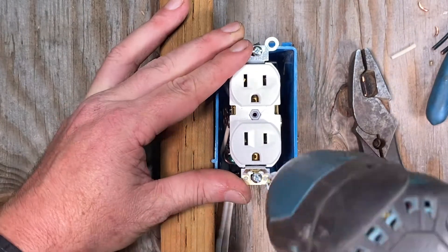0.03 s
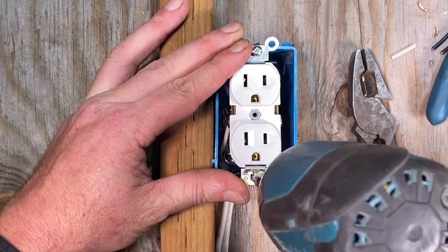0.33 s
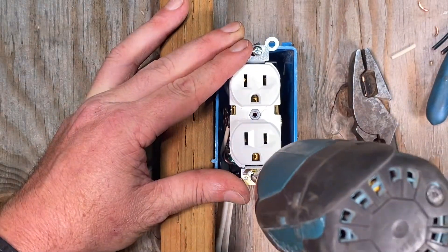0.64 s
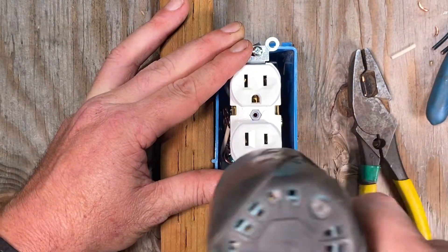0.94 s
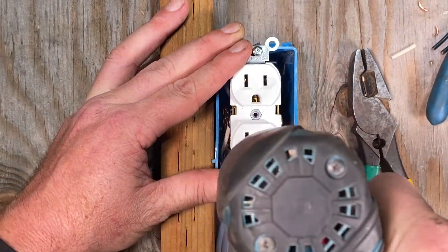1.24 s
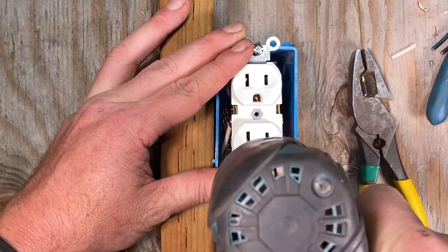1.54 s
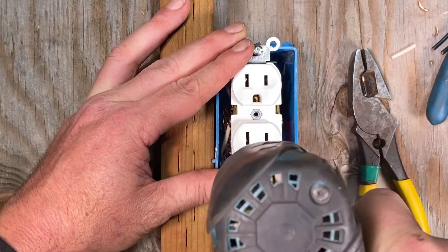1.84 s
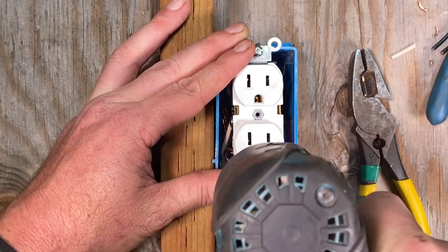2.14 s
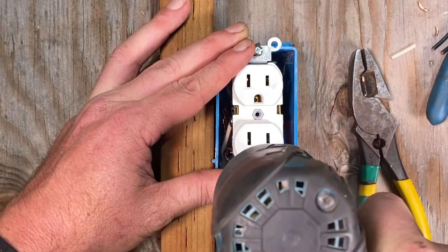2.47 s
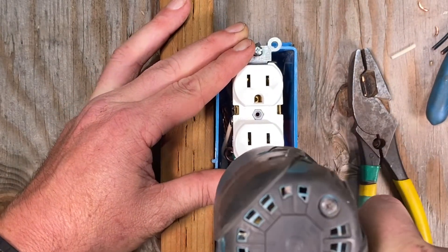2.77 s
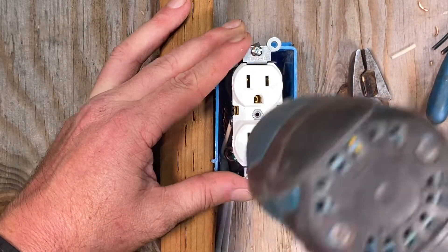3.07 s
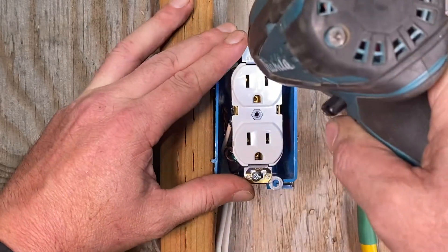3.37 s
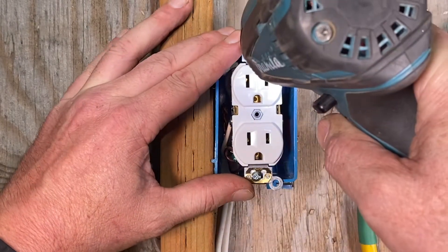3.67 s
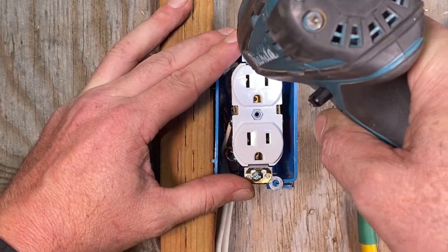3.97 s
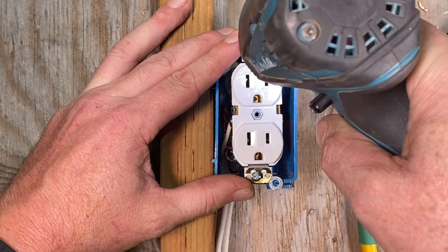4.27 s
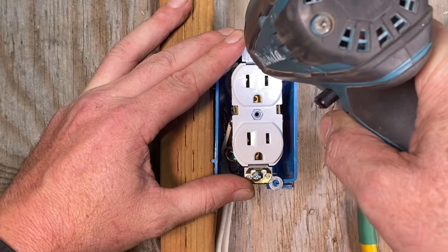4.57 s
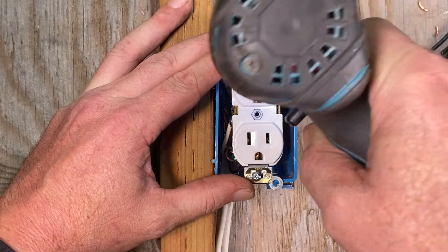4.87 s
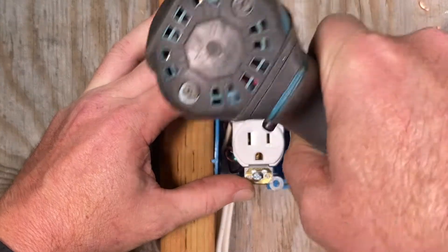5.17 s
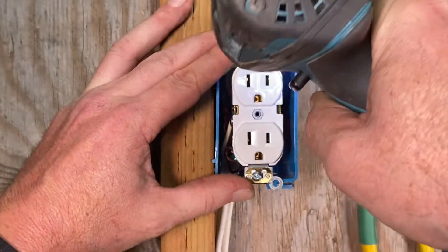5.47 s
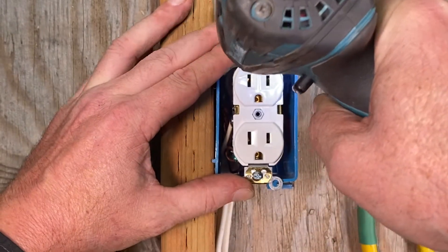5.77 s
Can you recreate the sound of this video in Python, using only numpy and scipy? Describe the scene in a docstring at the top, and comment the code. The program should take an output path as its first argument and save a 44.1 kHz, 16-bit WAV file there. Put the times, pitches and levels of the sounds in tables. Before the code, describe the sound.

Light, hollow knocks and small metallic ticks come from a bit hunting for a screw slot on a socket. Then a cordless screw gun pulses six times in a steady rhythm, clicking and whirring. The motor pauses while the bit taps and slides on the next screw, ending in a firm knock, before three more quick pulses. Everything is heard close up in a quiet workshop with little echo.

```python
"""A ring fades in a quiet workshop, and a steel bit knocks about on a screw head in a plastic wall box.
Each impact excites the damped modes of the steel, the box and the wooden board beneath it.
A cordless screw gun, close by, then drives the two screws of a socket in short pulls: the trigger
clicks, and the motor spins up through rattling, whining gears and is braked again.
Between the screws the bit knocks and slides as it hunts for the slot."""
import sys
import numpy as np
from scipy import signal
from scipy.fft import rfft, irfft, next_fast_len
from scipy.io import wavfile

SR = 44100
rng = np.random.default_rng(int(sys.argv[2]) if len(sys.argv) > 2 else 0)


def waveform_to_disk(signal):
    """Save audio, clipped to [-1, 1], as 16-bit WAV at the path in sys.argv[1]."""
    frames = np.transpose(np.atleast_2d(signal))
    scaled = np.clip(frames, -1, 1) * 32767
    samples = np.round(scaled).astype(np.int16)
    wavfile.write(sys.argv[1], SR, samples)


N = 264996
T = np.arange(N) / SR
PADDED = next_fast_len(2 * N, real=True)
FREQ = np.fft.rfftfreq(PADDED, 1 / SR)


def undb(db):
    """Amplitude ratio of a level in decibels."""
    return 10 ** (np.asarray(db) / 20)


def unit(x):
    """Normalisation to rms 1."""
    return x / np.sqrt(np.mean(x ** 2) + 1e-20)


def equal_energy(x):
    """Normalisation to the energy of rms 1 held for 20 ms."""
    return x * np.sqrt(.02 * SR / np.sum(x ** 2))


def blend(ends_db, share):
    """Gain interpolated between two levels as share goes from 0 to 1."""
    return undb(np.interp(share, (0, 1), ends_db))


def colour(x, points):
    """Zero-phase filtering by a spectrum of (f/Hz, level/dB) points."""
    hz, db = np.transpose(points)
    size = next_fast_len(2 * len(x), real=True)
    f = np.maximum(np.fft.rfftfreq(size, 1 / SR), 1)
    gain = undb(np.interp(np.log(f), np.log(hz), db))
    return irfft(rfft(x, size) * gain, size)[:len(x)]


def noise(points, size=N):
    """Spectrally shaped Gaussian noise of rms 1."""
    return unit(colour(rng.standard_normal(size), points))


def fade(t60, size):
    """Exponential decay, 60 dB in t60 seconds."""
    return np.exp(-np.log(1000) * T[:size] / t60)


def add(track, s, x):
    """Superposition of x on a track at s seconds."""
    i = max(int(s * SR), 0)
    track[i:i + len(x)] += x[:N - i]


# spectra of the opening ring and of the room air: f/Hz, level/dB
RINGING_SPECTRUM = [(60, -4), (400, 2), (1000, -13.5), (2200, -5), (4000, -17.5), (10000, -17.5),
                    (16000, -34)]
AIR_SPECTRUM = [(15, -20), (25, -6.5), (53, -0.5), (120, -5.5), (153, -7), (200, -11.5), (416, -14.5),
                (936, -30), (2000, -32), (16000, -52.5)]
def background():
    """Exponential decay: the ring of earlier work sinks into the steady noise of the room air."""
    hold_s, t60_s = 0.1, 0.55
    dying = np.exp(-np.log(1000) * np.maximum(T - hold_s, 0) / t60_s)
    ringing = undb(-51.5) * dying * noise(RINGING_SPECTRUM)
    air = noise(AIR_SPECTRUM) + np.array([[.2], [-.2]]) * noise(AIR_SPECTRUM)
    return ringing + undb(-61) * air


def ring(modes, detune, size):
    """Modal superposition: damped sines whose pitch and strength vary with the contact point."""
    hz, width, db = np.transpose(modes)[:, :, None]
    shift, strength = rng.standard_normal((2, len(modes), 1))
    waves = np.exp(-np.pi * width * T[:size]) * np.sin(2 * np.pi * hz * (1 + detune * shift) * T[:size])
    polarity = (-1) ** np.arange(len(modes))[:, None]
    return np.sum(polarity * undb(db + 2 * strength) * waves, axis=0)


def skid(size, rise_s=0.0014):
    """Transient friction: the envelope of a brief sliding contact swells and dies away."""
    return T[:size] / rise_s * np.exp(1 - T[:size] / rise_s)


def bend(x, lag_at_1k_s):
    """Dispersion: bending waves in a board travel as the root of frequency, so the lows arrive late."""
    phase_lag = 4 * np.pi * lag_at_1k_s * np.sqrt(FREQ * 1000)
    return irfft(rfft(x, PADDED) * np.exp(-1j * phase_lag), PADDED)[:N]


# modes of box and socket, of steel bit and socket strap, and of the board: f/Hz, bandwidth/Hz, level/dB
BOX_MODES = [(602, 45, -10.5), (805, 85, -6.5), (1045, 155, 4), (1149, 85, 7.5), (1575, 59, -9)]
STEEL_MODES = [(2120, 290, 2), (2314, 80, -5.5), (2730, 220, -2.5), (3470, 500, -4.5), (4000, 150, -12.5)]
BOARD_MODES = [(82.4, 14, -7), (120, 21, 3.5), (257.3, 34, 2), (315, 15, 2.5), (453, 31, 4)]
# spectra of the shaken board, and of steel ticking and sliding on the screw head: f/Hz, level/dB
SHAKE_SPECTRUM = [(25, -17), (50, 1), (75, -2), (130, 2), (180, -13.5), (300, -10), (600, -21), (1500, -42)]
TICK_SPECTRUM = [(1500, -3.5), (3500, 8), (5000, 2), (6300, -3.5), (7500, -2), (11000, -4), (16000, -21)]
SCRAPE_SPECTRUM = [(120, -8), (330, 4.5), (700, -3.5), (1100, -7), (1700, -4), (2400, -5.5), (4500, -20),
                   (16000, -28.5)]
SECOND_SCREW_S = 3.3
def knock(s, hardness, weight, size=8192):
    """Impact excitation: hard contact favours the steel, soft contact the box, and weight the board."""
    contact = 0.59 * rng.standard_normal(size) * skid(size)
    contact[0] += 1  # an impulse starts the skid
    box = signal.fftconvolve(ring(BOX_MODES, .03, size), contact)[:size]
    steel = signal.fftconvolve(ring(STEEL_MODES, .03, size), contact)[:size]
    board = unit(ring(BOARD_MODES, 0.017, size))
    rumble = unit(noise(SHAKE_SPECTRUM, size) * fade(0.19, size))
    tick = equal_energy(noise(TICK_SPECTRUM, size) * skid(size))
    scrape = noise(SCRAPE_SPECTRUM, size) * fade(0.43, size)
    hollow = box / np.max(np.abs(box)) + undb(-29.5) * scrape
    # at the first screw the strap rings more and the box less
    strap_db, box_db = (2.5, -3) if s < SECOND_SCREW_S else (0, 0)
    return (undb(box_db) * blend((3, -8), hardness) * hollow
            + undb(strap_db) * blend((-25.5, -16.5), hardness) * equal_energy(steel)
            + blend((-37, -15), hardness) * tick
            + blend((-30, -5.5), weight) * equal_energy(board + 0.9 * rumble))


# knocks of the bit: t/s, level/dB, hardness (0 plastic to 1 steel), weight behind it (0 to 1)
BIT_KNOCKS = [(.523, -22, 0.43, 0.42), (.595, -26.5, 0.49, 0.27), (.616, -22.5, .6, 0),
              (0.67, -29, 0.52, 0.4), (.721, -19.5, 0.38, 0.4), (.743, -22.5, 0.97, 0.33),
              (.934, -23, 0.64, 0.7), (1.076, -19, 0.63, 0.93), (2.985, -25, 0.7, .25),
              (3.136, -23.5, 0.84, 0.11), (3.598, -31.5, 0.31, 0.67), (3.651, -35.5, 1, 0.4),
              (3.679, -32, 1, 0), (3.888, -17.5, 0.57, 0.47), (4.065, -34.5, 0.71, 0.33),
              (4.22, -24, .05, 0.32), (4.276, -20.5, 0.65, 0.54), (4.33, -18, 0.38, 0.24),
              (4.547, -23, 0.32, 0.3), (4.568, -21.5, 0.44, 0.45), (4.588, -20.5, 0.78, 0.1),
              (4.692, -20, 0.63, 0.3), (4.729, -29, 0.5, 0.46), (4.929, -25.5, .1, 0.71),
              (5.057, -8, 0.5, 0.1)]
# spans in which the bit hunts for the slot: start t/s, end t/s
SLOT_HUNTS = [(.6, .82), (0.899, 1.174), (3.58, 3.75), (4.27, 4.5), (4.53, 4.74)]
def knocks(bounce_s=.007, touches_per_s=22):
    """Rebound and friction: each firm knock bounces once; the hunting bit slides and touches lightly."""
    out = np.zeros(N)
    for s, db, hardness, weight in BIT_KNOCKS:
        lands = s - .002
        add(out, lands, undb(db) * knock(s, hardness, weight))
        rebounds = lands + bounce_s * rng.uniform(0.55, 1.3)
        add(out, rebounds, undb(db - 14) * knock(s, hardness, weight))
    for start, end in SLOT_HUNTS:
        span = int((end - start) * SR)
        add(out, start, undb(-59) * noise(SCRAPE_SPECTRUM, span) * signal.windows.tukey(span))
        count = max(round((end - start) * touches_per_s), 1)
        for k, (when, force, hardness, weight) in enumerate(rng.random((count, 4))):
            db = -38 + 4.5 * (2 * force - 1)
            touches = start + (end - start) * (k + when) / count
            add(out, touches, undb(db) * knock(start, hardness, weight))
    return bend(out, lag_at_1k_s=0.0013)


# the tool's weight landing on the screw: t/s, level/dB, contact cutoff f/Hz
TOOL_LANDINGS = [(1.08, -29, 500), (1.086, -18.5, 828), (4.697, -34, 111.3), (5.058, -28, 139.2)]
def thumps(size=8192):
    """Soft contact acts as a low-pass: a heavy push swings the board once and rings its lowest modes."""
    blow_spectrum = [(30, -9.5), (120, 0), (300, -3.5), (520, -10.0), (750, -1.5), (1500, -17.0)]
    out = np.zeros(N)
    for s, db, cutoff_hz in TOOL_LANDINGS:
        blow = unit(colour(signal.unit_impulse(size), blow_spectrum))
        board = unit(ring(BOARD_MODES[:2], 0.015, size))
        soft = signal.sosfilt(signal.butter(2, cutoff_hz, fs=SR, output="sos"), blow + 0.68 * board)
        add(out, s, undb(db) * equal_energy(soft))
    return bend(out, lag_at_1k_s=0.0029)


# pulls: switch closes t/s, squeeze before it t/s, motor on t/s, free whine f/Hz, spin-up t/s, level/dB
TRIGGER_PULLS = [(1.281, 0.048, .064, 2366, .018, -14.5), (1.625, .044, 0.087, 2423, .03, -15.5),
                 (1.922, 0.047, .078, 2894, .026, -15), (2.265, 0.061, 0.046, 1200, .022, -22),
                 (2.495, .0435, .065, 2346, .022, -15), (2.787, 0.041, 0.069, 2907, 0.024, -15.5),
                 (5.315, .037, .069, 2798, .023, -16), (5.609, .0415, 0.074, 2785, .026, -16),
                 (5.907, .044, 0.067, 2340, .025, -14.5)]
# spectrum of a trigger click: f/Hz, level/dB
CLICK_SPECTRUM = [(300, -4.5), (1200, -6), (2300, 1.5), (5000, -5.5), (9000, -6.5), (16000, -13.5)]
def trigger(take_up_db=-26, switch_db=-18.5, size=2048):
    """Brief contacts give broadband clicks: the trigger takes up its slack, then the switch closes."""
    out = np.zeros(N)
    for closes, squeeze_s, *_ in TRIGGER_PULLS:
        for s, db in ((closes - squeeze_s, take_up_db), (closes, switch_db)):
            snap = noise(CLICK_SPECTRUM, size) * (skid(size) + 0.19 * fade(0.09, size))
            add(out, s, undb(db) * snap / np.max(np.abs(snap)))
    return out


FULL_HZ, START_LAG_S, BRAKE_S = 2688.6, 0.0049, .049  # mesh rate, start lag and braking at a full pull
TORQUE_RISE_S, TORQUE_FALL_S = 0.0081, 0.026
RUN_TORQUE, BRAKE_TORQUE = 0.13, 0.25  # shares of the starting surge
def motor():
    """Rotor inertia: speed lags each pull; speed and torque set the mesh rate and four envelopes."""
    mesh_hz, hiss, whine, chatter, shake = np.zeros((5, N))
    for closes, _, on_s, free_hz, spin_up_s, db in TRIGGER_PULLS:
        throttle = free_hz / FULL_HZ
        age = T - closes - START_LAG_S / throttle
        running = np.clip(age, 0, on_s)
        braking = np.clip(1 - (age - on_s) / (BRAKE_S * throttle), 0, 1)  # a slower rotor stops sooner
        spin = (1 - np.exp(-running / spin_up_s)) * braking
        # torque is greatest while the rotor gathers speed, and the brake loads the teeth again
        load = np.exp(-running / TORQUE_FALL_S) + RUN_TORQUE + BRAKE_TORQUE * (1 - braking)
        torque = (1 - np.exp(-running / TORQUE_RISE_S)) * load * np.sqrt(braking)
        mesh_hz += spin * free_hz
        hiss += undb(db) * throttle * spin ** 1.15
        whine += undb(db - 2.5) * throttle * spin ** 1.8 * np.sqrt(braking)
        chatter += undb(db + 1.5) * torque
        shake += undb(db - 18) * np.sqrt(spin)
    return mesh_hz, hiss, whine, chatter, shake


def rattle(points, per_s, scatter_db):
    """Shot noise: dense random tooth impacts of uneven size, at rms 1."""
    hits = (rng.random(N) < per_s / SR) * rng.choice([-1, 1], N)
    sizes = undb(scatter_db * rng.standard_normal(N))
    return unit(colour(hits * sizes, points))


# partials of the gear whine: multiple of the rotor frequency, level/dB
WHINE_ORDERS = [(5, -11), (6, -12), (8, -8), (9, -6), (10, -11), (11, -10), (14, -10), (16, -9), (18, -3),
                (27, 2), (35, -9), (36, -5), (45, -2), (54, -10)]
# spectra of running gears, of teeth under torque, and of the housing's radiation: f/Hz, level/dB
GEAR_SPECTRUM = [(200, -20), (550, -14), (850, -45), (1250, 12.5), (1550, -37.5), (2050, -3.5), (2900, 6),
                 (4500, -1), (5400, 12.5), (6200, -6), (7700, 10), (9300, 6), (11000, 15), (13500, 7.5),
                 (15700, 6)]
CHATTER_SPECTRUM = [(150, -6), (550, -13), (850, -2), (1400, -11), (2000, 0.5), (3100, 0.5), (4500, -7.5),
                    (8000, -10.5), (16000, -18.5)]
HOUSING_RESPONSE = [(700, -30), (1400, -14), (1950, 0), (2900, 0)]
def screw_gun(teeth=9):
    """Gear meshing: teeth hiss and whine with speed and slap under torque; the housing shakes the board."""
    mesh_hz, hiss, whine, chatter, shake = motor()
    jitter = 1 + .006 * noise([(150, 0), (700, -30), (5000, -70)])
    mesh_phase = 2 * np.pi * np.cumsum(mesh_hz * jitter) / SR
    rotor = mesh_phase / teeth
    tightness = 1 + 0.13 * np.sin(rotor)  # the mesh tightens once a turn, which gives sidebands
    flicker = [(200, 0), (700, -25), (4000, -70)]
    tones = sum(undb(db + 3.5 * noise(flicker)) * np.sin(k * rotor) for k, db in WHINE_ORDERS)
    running = hiss * rattle(GEAR_SPECTRUM, per_s=14000, scatter_db=2.5) + whine * unit(tones)
    roughness = 1 + .7 * noise([(250, 0), (900, -25), (4000, -70)])
    growl = colour(np.sin(mesh_phase) * roughness, HOUSING_RESPONSE)  # tooth slap at the mesh rate
    loaded = chatter * (rattle(CHATTER_SPECTRUM, per_s=4000, scatter_db=3.0) + .9 * growl)
    board = bend(shake * noise(SHAKE_SPECTRUM), lag_at_1k_s=.004)
    return tightness * running + loaded + board


def reverb(x, points, t60, db):
    """Diffuse reflection: convolution with decaying noise that reaches both sides nearly alike."""
    envelope = fade(t60, N) * (1 - np.exp(-T / 0.001))
    mid, side = (colour(rng.standard_normal(N), points) * envelope for _ in range(2))
    side = colour(side, [(60, -20.5), (300, -8.0), (1100, 2.5), (2100, -9), (3300, -9.5),
                         (6000, -14), (12000, -2.5)])
    response = (mid + np.array([[1], [-1]]) * side) * undb(db) / np.sqrt(np.sum(fade(t60, N) ** 2))
    return signal.fftconvolve(x[None], response, axes=1)[:, :N]


# spectra of the early reflections and of the late reverberation: f/Hz, level/dB
BENCH_SPECTRUM = [(40, 5.5), (130, 5), (400, 2.5), (1200, -4.5), (3000, -7.5), (7000, -8), (16000, -19)]
ROOM_SPECTRUM = [(40, 12), (130, 10.5), (400, 0.5), (1200, 0), (3000, -4.5), (7000, -6), (16000, -25)]
def scene():
    """Superposition of direct sound, quick reflections off the bench, a faint room tail and background."""
    direct = screw_gun() + trigger() + knocks() + thumps()
    bench = reverb(direct, BENCH_SPECTRUM, t60=0.17, db=-5.5)
    room = reverb(direct, ROOM_SPECTRUM, t60=0.67, db=-17.5)
    return direct + bench + room + background()


# phase shift of the left channel: f/Hz, phase/rad
LEFT_PHASE = [(0, 0), (6850, 0), (8100, -1.9), (8500, -3.14), (8750, -3.3), (9650, -6.28), (10350, -6.28),
              (11650, -9.42), (12400, -9.42), (13550, -12.57), (14400, -12.57), (15450, -15.7)]
def record(dry):
    """Interchannel phase widens the treble; saturation rounds the peaks; filters cut deep bass and top."""
    dry = signal.sosfilt(signal.butter(6, 44, "high", fs=SR, output="sos"), dry)
    phase = np.interp(FREQ, *np.transpose(LEFT_PHASE))
    left = irfft(rfft(dry[0], PADDED) * np.exp(1j * phase), PADDED)[:N]
    rounded = np.tanh(np.array([left, dry[1]]))
    return signal.sosfilt(signal.ellip(10, .2, 60, 15750, fs=SR, output="sos"), rounded)


dry = scene()
out = record(dry)
waveform_to_disk(out)
```